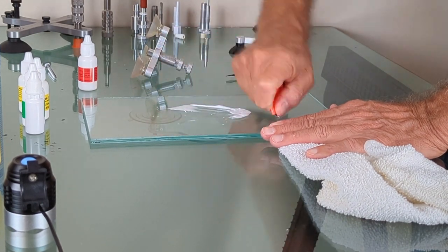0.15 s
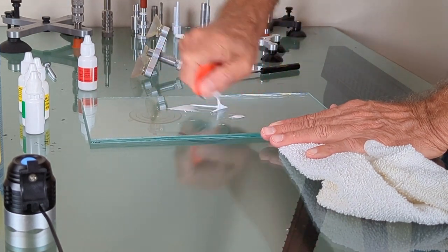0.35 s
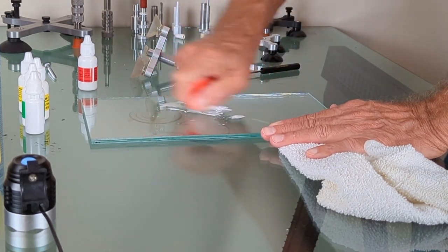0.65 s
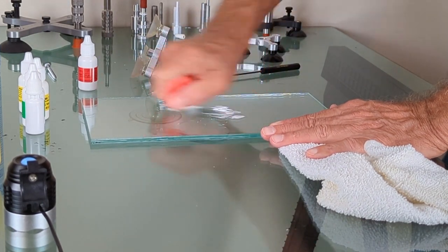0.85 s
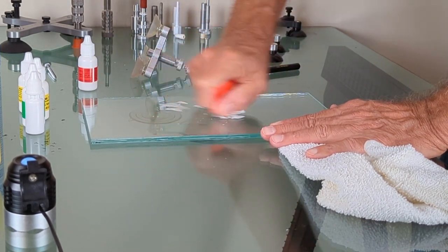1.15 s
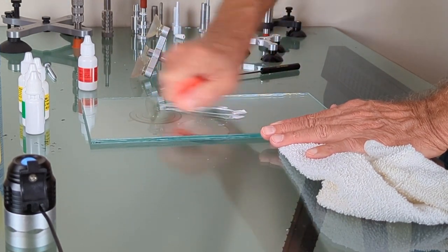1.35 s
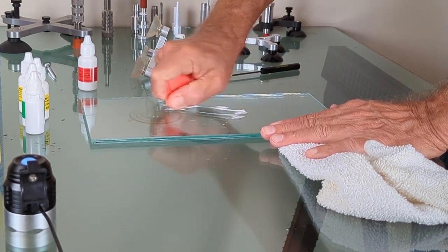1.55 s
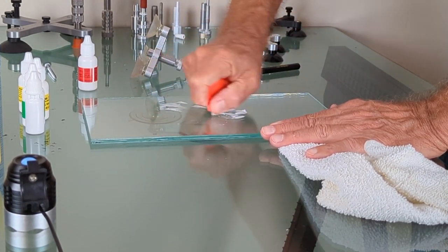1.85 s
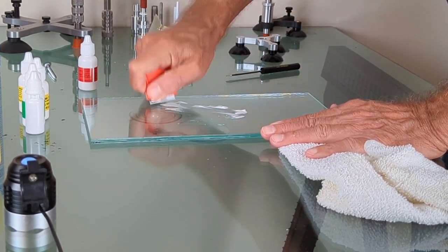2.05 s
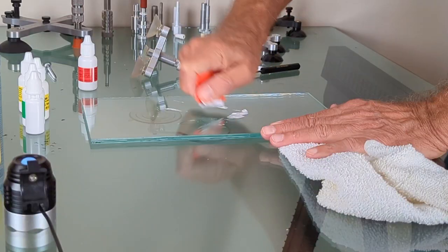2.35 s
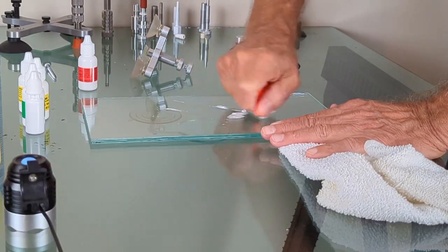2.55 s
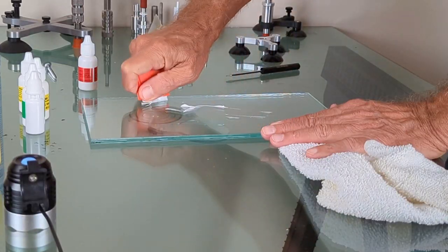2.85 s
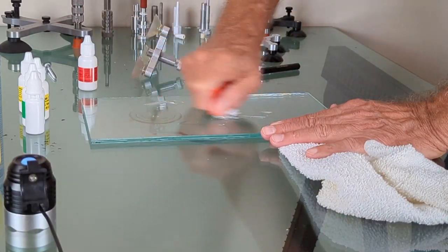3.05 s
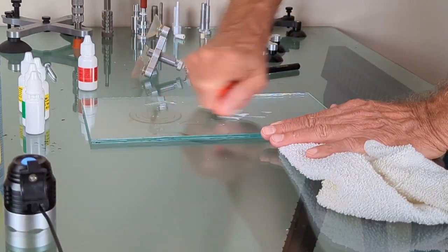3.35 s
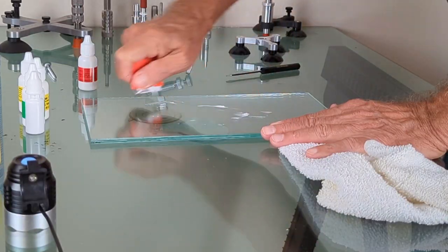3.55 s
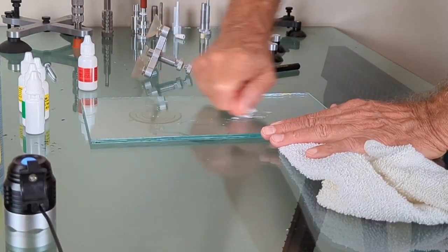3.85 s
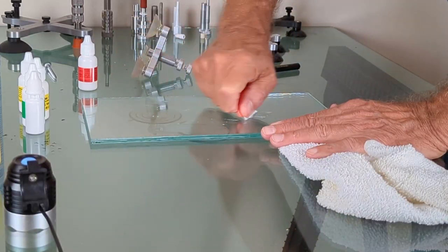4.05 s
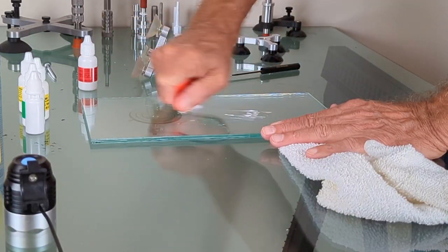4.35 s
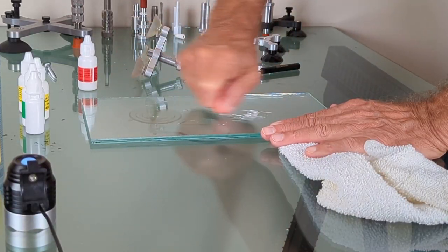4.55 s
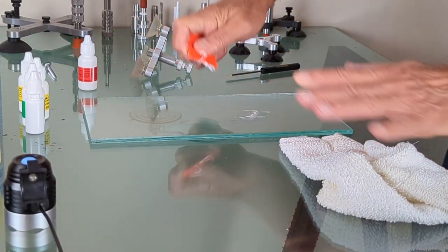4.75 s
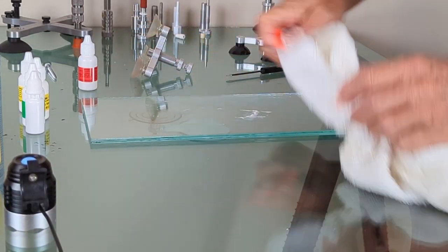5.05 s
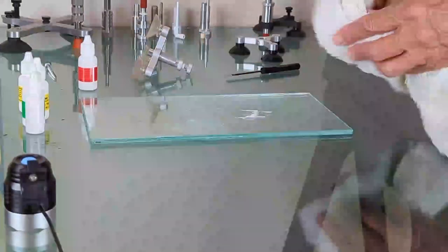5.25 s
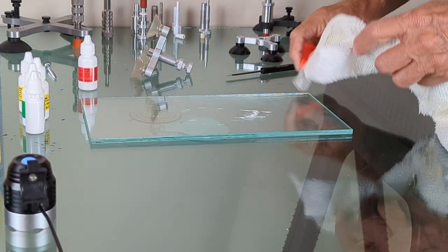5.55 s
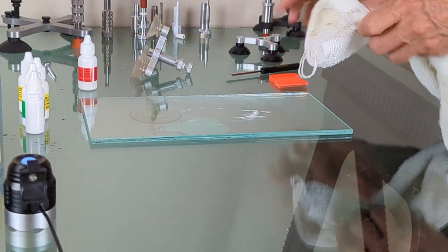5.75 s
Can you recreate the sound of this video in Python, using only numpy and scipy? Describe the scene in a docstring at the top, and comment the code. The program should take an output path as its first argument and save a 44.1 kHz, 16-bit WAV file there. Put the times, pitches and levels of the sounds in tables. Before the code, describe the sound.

A razor scraper cracks and rasps quickly back and forth on a glass plate, softens to light glides, then cloth rustles and plastic clatters.

```python
"""A razor scraper in a plastic holder works wet glue off a glass plate that lies on a glass table, in a small room.
The blade snaps through hard spots: short jolts ring the plate and shake the table. It rasps back and forth as
clumped tiny slips, then taps down and glides lightly over the cleared glass.
At the end filtered noise rustles as a towel is picked up, and the dropped scraper clatters like small blows.
Mains hum (sine tones) and room air (wavering noise) lie underneath."""
import sys
import numpy as np
from scipy import signal
from scipy.fft import rfft, irfft, next_fast_len
from scipy.io import wavfile
from scipy.ndimage import uniform_filter1d, map_coordinates

SR = 44100
rng = np.random.default_rng(int(sys.argv[2]) if len(sys.argv) > 2 else 0)


def materialize(psi):
    """Save the field psi as 16-bit PCM at rate SR to the path in sys.argv[1].

    A 1-D psi becomes a single channel; in a 2-D psi each row is a channel.
    """
    bounded = np.clip(np.atleast_2d(psi).T, -1, 1)
    quanta = np.round(bounded * 32767).astype(np.int16)
    wavfile.write(sys.argv[1], SR, quanta)


N = 259749  # length in samples

# Throughout, t60 is the time in seconds to fade by 60 dB. A movement's level is that of its loudest moment,
# before the room is added; one "half length" away from there it is 2 to 3 dB softer.
KNOCK_HZ, RING_HZ, EDGE_HZ, TOP_HZ = 200, 1100, 3400, 16200  # borders between knock, ring and edge sound


def amp(db):
    """Decibels to gain."""
    return 10 ** (np.asarray(db) / 20)


def unit(x):
    """Scaled to rms 1."""
    return x / np.sqrt(np.mean(x ** 2) + 1e-20)


def along(points, hz):
    """Values between (Hz, value) points, read on a logarithmic frequency axis."""
    f, v = np.transpose(points)
    return np.interp(np.log(hz + 1), np.log(f + 1), v)


def wander(size, positions):
    """A smooth random curve, about rms 1 at its knots, which lie one position apart."""
    return map_coordinates(rng.standard_normal(size), [positions])


def add(track, s, x):
    """Mix x into the track from time s."""
    part = track[:, max(round(s * SR), 0):][:, :x.shape[-1]]
    part += x[..., :part.shape[-1]]


def filtered(x, response):
    """Shape the spectrum of x by a function of frequency."""
    n = x.shape[-1]
    padded = next_fast_len(n + SR // 10)
    spectrum = rfft(x, padded) * response(np.fft.rfftfreq(padded, 1 / SR))
    return irfft(spectrum, padded)[..., :n]


def band(x, lo, hi, order=4):
    """Keep the frequencies from lo to hi, looking only at past samples."""
    return signal.sosfilt(signal.butter(order, [lo, hi], "band", fs=SR, output="sos"), x)


# How alike left and right are. Each row: frequency in Hz, likeness (1 the same, 0 unrelated, below 0 opposed).
ALIKE = [(100, 0.97), (300, 0.85), (700, 0.7), (1500, 0.45), (3100, -0.05), (7000, 0.3), (15000, -0.1)]


def diffuse(n):
    """Stereo noise from all around: alike in the bass, mostly unrelated in the treble."""
    def shares(hz):
        angle = np.arccos(np.clip(along(ALIKE, hz), -1, 1)) / 2
        return np.array([np.cos(angle), np.sin(angle)])
    mid, side = filtered(rng.standard_normal((2, n)), shares)
    return np.array([mid + side, mid - side])


# How far the blade's sound leads on the left. Each row: frequency in Hz, lead in radians before scatter.
LEAD = [(600, 0), (1300, .7), (2500, .75), (3400, 1.9), (7000, 2), (11000, 2.2), (15000, 2.5)]
LEAD_SCATTER = .3  # reflections off the table vary the lead, as a share of it


def placed(x, off_centre):
    """A point source whose sound leads on one side: 0 lies straight ahead, 1 where the blade works."""
    knots = rng.standard_normal(SR // 300)

    def response(hz):
        scatter = 1 + LEAD_SCATTER * map_coordinates(knots, [hz / 500])
        lead = off_centre * along(LEAD, hz) * scatter
        return np.exp(.5j * lead * np.array([[1], [-1]]))
    return filtered(x, response)


def body(colour, peaks, ripple_db=0, size=4096):
    """Impulse response of an object: broad colour, resonances, and a random ripple for its dense modes."""
    hz = np.fft.rfftfreq(size, 1 / SR)
    db = along(colour, hz) + sum(lift / (1 + (2 * (hz - f) / width) ** 2) for f, width, lift in peaks)
    # the place of contact decides how strongly each mode answers
    db = db + ripple_db * wander(size, np.sqrt(hz))
    # keeping one half of the cepstrum makes the response start at once; overall level is set later
    cepstrum = irfft(np.log(amp(db)))[:size // 2]
    return irfft(np.exp(rfft(2 * cepstrum, size)))


# How long the room rings. Each row: frequency in Hz, t60 in seconds.
ROOM = [(100, 0.56), (500, 0.086), (2000, 0.14), (6000, 0.14), (15000, 0.13)]
LATE_DB, LATE_T60_S = -13, .36  # a faint, longer tail of the room


def roomy(x, wet_db):
    """Add a fresh room tail: noise in which each frequency dies at its own speed."""
    hz, t, z = signal.stft(diffuse(SR // 2), SR, nperseg=256)
    early = amp(-60 * t / along(ROOM, hz)[:, None])
    late = amp(LATE_DB - 60 * t / LATE_T60_S)
    onset = 1 - np.exp(-t / .006)
    tail = signal.istft(z * (early + late) * onset, SR)[1]
    tail = tail / np.linalg.norm(tail[0])
    return x + amp(wet_db) * signal.fftconvolve(x, tail, axes=1)[:, :x.shape[1]]


def at_level(x, db, seconds):
    """Scale x so that its first moments, both sides averaged, have this rms level."""
    return x * amp(db) / np.sqrt(np.mean(x.mean(0)[:int(seconds * SR)] ** 2))


SURFACE_DB = -2  # chatter radiated by the whole surface, relative to the point of contact


def contact(response, chatter_t60, snap_db, rebound_db, off_centre):
    """A sharp snap, a rebound a few ms later and separate dying jolts, sent through a body."""
    t = np.arange(SR // 3) / SR
    snap = np.zeros(len(t))
    snap[SR // 1400] = amp(snap_db)
    snap[int(SR * rng.uniform(.003, .0045))] = amp(snap_db + rebound_db)
    ragged = amp(3.5 * wander(len(t), 500 * t))
    jolts = rng.standard_normal(len(t)) * (rng.random(len(t)) < .08)
    # part comes straight from the point of contact, part from the whole surface
    chatter = placed(unit(jolts), off_centre) + amp(SURFACE_DB) * diffuse(len(t))
    chatter = chatter * ragged * amp(-60 * t / chatter_t60)
    force = placed(snap, off_centre) + chatter / np.linalg.norm(chatter[0])
    return signal.fftconvolve(force, response[None], axes=1)[:, :len(t)]


def three_part_hit(crack, knock, ring_db, edge_db, knock_db, knock_from_hz):
    """A hit from three frequency bands, low knock, ring and edge, each set to its own level."""
    ring = at_level(band(crack, RING_HZ, EDGE_HZ), ring_db, .019)
    edge = at_level(band(crack, EDGE_HZ, TOP_HZ), edge_db, .019)
    return ring + edge + at_level(band(knock, knock_from_hz, RING_HZ), knock_db, .03)


def sliding(colour, peaks, grain_rate, grain_db, smooth_db, rough_db, size=N):
    """Friction: a stream of tiny slips of uneven size that come in clumps, heard through a body."""
    happens = rng.random(size) < grain_rate / SR  # grain_rate: slips per second
    slips = happens * rng.standard_normal(size) * amp(grain_db * rng.standard_normal(size))
    clumps = amp(rough_db * wander(size, 160 * np.arange(size) / SR))
    force = clumps * (placed(unit(slips), off_centre=1) + amp(smooth_db) * diffuse(size))
    return signal.oaconvolve(force, body(colour, peaks)[None], axes=1)[:, :size]


def swells(middles, halves, dbs):
    """Power of bell-shaped movements of the hand."""
    t, power = np.arange(N) / SR, np.zeros(N)
    for s, half, db in zip(middles, halves, dbs):
        near = abs(t - s) < 4 * half
        power[near] += amp(db) ** 2 * np.exp(-((t[near] - s) / (1.4 * half)) ** 2)
    return power


RUB_MIDDLE_S = .25
RUB_GRAIN_DB, RUB_ROUGH_DB = 2.5, 2.5  # uneven size of the slips, and how strongly they clump


def brief_rub(colour, peaks, half, db, grain_rate, smooth_db):
    """Half a second of friction holding one gritty bell-shaped rub at its middle."""
    t = np.arange(SR // 2) / SR
    bell = np.exp(-.5 * ((t - RUB_MIDDLE_S) / (1.28 * half)) ** 2)
    rub = bell * sliding(colour, peaks, grain_rate, RUB_GRAIN_DB, smooth_db, RUB_ROUGH_DB, size=len(t))
    return amp(db) * rub * np.sqrt(np.sum(bell ** 2) / np.sum(rub.mean(0) ** 2))


AIR_PATCHY_DB, AIR_DRIFT_DB = 1.8, .7  # the air wavers in patches and as a whole (rms)


def wavering(x):
    """Give x slow patches of random gain over time and frequency."""
    z = signal.stft(x, nperseg=512)[2]
    patches = uniform_filter1d(rng.standard_normal(z.shape[1:]), size=7, axis=0)
    patches = uniform_filter1d(patches, size=16, axis=1)
    drift = uniform_filter1d(rng.standard_normal(z.shape[2]), size=30)
    gain = amp(AIR_PATCHY_DB * unit(patches) + AIR_DRIFT_DB * unit(drift))
    return signal.istft(z * gain, nperseg=512)[1][:, :N]


# Colour of the room air. Each row: frequency in Hz, relative level in dB per Hz.
AIR = [(20, -29), (40, -25), (60, -2.5), (85, -13.5), (120, -5), (200, -18), (380, -17.5), (680, -23),
       (830, -30), (1400, -31.5), (2100, -28.5), (2800, -29), (3700, -35), (5200, -42), (6400, -37.5),
       (8000, -44.5), (9000, -42), (11700, -53), (16000, -55.5)]
# Tones of the mains hum. Each row: frequency in Hz, level in dB rms.
HUM = [(59.6, -62), (119.5, -73.5), (232, -73), (291, -76), (404, -81.5)]
# A faint ring that is already dying away. Each row: frequency in Hz, width in Hz, starting level in dB,
# t60 in seconds.
FADING_RING = [(2290, 400, -56, 0.33), (3224, 60, -49, 0.2), (4290, 200, -56, 0.33),
               (6487, 220, -53.5, 0.3)]


def background():
    """Room air is coloured noise, mains hum is steady tones, and narrow noise rings out at the start."""
    t = np.arange(N) / SR
    air = amp(-56.5) * unit(wavering(filtered(diffuse(N), lambda hz: amp(along(AIR, hz)))))
    hum = sum(np.sqrt(2) * amp(db) * np.sin(2 * np.pi * (hz * t + rng.random())) for hz, db in HUM)
    for hz, width, db, t60 in FADING_RING:
        ring = unit(band(diffuse(SR), hz - width / 2, hz + width / 2, order=1))
        add(air, 0, ring * amp(db - 60 * t[:SR] / t60))
    return air + hum


# The towel rustles. Each row: middle in seconds, half length in seconds, level in dB,
# frequency in Hz around which it is brightened.
RUSTLES = [(4.688, 0.01, -63, 3230), (4.73, 0.033, -67, 3700), (4.828, 0.0054, -58.5, 3770),
           (4.902, 0.034, -60.5, 2160), (5.203, 0.016, -65, 2514), (5.302, 0.027, -62, 2400),
           (5.362, 0.022, -58, 4240), (5.584, 0.042, -65.5, 2000), (5.861, 0.026, -62.5, 2370)]
# Colour of the towel. Each row: frequency in Hz, relative level in dB per Hz.
TOWEL = [(200, -15.5), (680, 7.5), (900, -4.5), (2400, 1.5), (4000, -0.5), (9000, -5.5), (16000, -25)]
# The hand bumps the table softly. Each row: frequency in Hz, level in dB before the soft onset, t60 in seconds.
BUMP = [(100, -44, .15), (160, -44, .11), (300, -42, .11), (370, -47, .1), (680, -50, .05),
        (1040, -58, .03)]
BUMP_TIME = 4.857  # seconds
# The hand slides off the table: start in seconds, starting pitch, its rise, level before fade and soft onset.
JUDDER_TIME, JUDDER_HZ, JUDDER_RISE_HZ_PER_S, JUDDER_DB = 4.872, 300, 1500, -38


def towel():
    """The steadying hand rubs cloth, bumps table modes and slides off with a rising judder."""
    t, out = np.arange(SR // 3) / SR, np.zeros((2, N))
    for s, half, db, bright_hz in RUSTLES:
        rustle = brief_rub(TOWEL, [(bright_hz, 1200, 5)], half, db, grain_rate=5000, smooth_db=3)
        add(out, s - RUB_MIDDLE_S, rustle)
    bump = sum(amp(db - 60 * t / t60) * np.sin(2 * np.pi * (hz * t + rng.random())) for hz, db, t60 in BUMP)
    add(out, BUMP_TIME, bump * (1 - np.exp(-t / 0.0023)))
    pitch = JUDDER_HZ + JUDDER_RISE_HZ_PER_S * t + 40 * wander(len(t), 200 * t)
    judder = np.sin(2 * np.pi * np.cumsum(pitch) / SR)
    add(out, JUDDER_TIME, judder * amp(JUDDER_DB - 60 * t / 0.15) * (1 - np.exp(-t / 0.012)))
    return out


# The dropped scraper bounces. Each row: start in seconds, ring level in dB, edge level in dB, knock level in dB,
# t60 of the rattle in seconds, snap over rattle in dB, ring in Hz, edge ring in Hz.
BOUNCES = [(5.652, -35, -44.5, -55, 0.036, -4, 2010, 5500), (5.682, -37, -43, -53.5, 0.15, -3, 2190, 6100),
           (5.7064, -31.5, -26, -43, 0.051, -4, 2220, 8800), (5.718, -50, -34.5, -44, 0.12, -7, 2260, 4050),
           (5.7583, -41, -35, -53.5, 0.075, -7.5, 2600, 4300)]
# Colour of the plastic holder on the table. Each row: frequency in Hz, relative level in dB.
HOLDER = [(150, -6), (400, 2.5), (750, -2.5), (1000, -15), (1500, -1), (2100, 0), (3200, -6.5), (4200, -8),
          (5100, -12), (6500, -2), (7500, -7.5), (9300, -4), (12000, -13), (16000, -15)]
# Its resonances. Each row: frequency in Hz, width in Hz, lift in dB.
HOLDER_PEAKS = [(3790, 430, 7.8), (4380, 74, 4), (8540, 290, 4.4)]


def dropped_scraper():
    """The light plastic holder skids and clatters on the table; each corner that lands rings differently."""
    out = np.zeros((2, N))
    for s, ring_db, edge_db, knock_db, rattle_t60, snap_db, ring_hz, edge_hz in BOUNCES:
        rings = [(ring_hz, 620, 9), (edge_hz, 650, 7)]
        holder = body(HOLDER, HOLDER_PEAKS + rings, ripple_db=4.0)
        clack = contact(holder, rattle_t60, snap_db, rebound_db=-8, off_centre=-.5)
        # the low knock rattles on longer
        knock = contact(holder, rattle_t60 + 0.15, snap_db=-12.0, rebound_db=6.5, off_centre=-.5)
        hit = three_part_hit(clack, knock, ring_db, edge_db, knock_db, KNOCK_HZ / 2)
        add(out, s, roomy(hit, wet_db=-14.5))
    skid = unit(filtered(diffuse(N), lambda hz: amp(along(HOLDER, hz))))
    return out + skid * np.sqrt(swells([5.651, 5.68, 5.704], [.004, .012, .003], [-48, -48, -41]))


# Colour of the blade lifting off. Each row: frequency in Hz, relative level in dB.
TICK = [(2000, -32), (6000, -22), (8500, -14), (9200, 0), (10200, -5), (11300, -4), (12500, -22),
        (16000, -36)]
TICK_TIME, TICK_DB = 4.606, -60  # start in seconds, level


def lift_off():
    """The wet blade leaves the glass with a thin, high tick: one small contact, brightly coloured."""
    out = np.zeros((2, N))
    tick = contact(body(TICK, []), 0.07, snap_db=-14, rebound_db=0, off_centre=.5)
    add(out, TICK_TIME, at_level(tick, TICK_DB, .019))
    return out


# Light strokes over the cleared glass. Each row: middle in seconds, half length in seconds, level in dB,
# blade resonance in Hz.
PASSES = [(1.939, 0.018, -70, 2120), (2.211, 0.02, -63, 2250), (2.326, 0.018, -70, 2310),
          (2.665, 0.013, -62, 2120), (2.978, 0.021, -61.5, 2195), (3.099, 0.02, -62, 2260),
          (3.166, 0.018, -57, 1980), (3.338, 0.032, -58.5, 2270), (3.783, 0.012, -55.5, 2185),
          (3.908, 0.013, -63, 2500), (3.993, 0.03, -62, 2150), (4.124, 0.019, -64.5, 2280),
          (4.179, 0.0093, -51, 2240), (4.206, 0.019, -60, 2160), (4.321, 0.026, -62.5, 2340),
          (4.384, 0.0083, -51, 2200), (4.408, 0.009, -57, 1890), (4.555, 0.043, -63, 2150)]
# Under light pressure the blade itself whispers. Each row: frequency in Hz, relative level in dB.
GLIDE = [(300, -15), (650, -16), (900, -29), (1350, -20), (1600, -5), (2100, -5), (2550, -5), (3200, -14),
         (4200, -19), (5200, -14), (6200, -7), (7600, -19), (9300, -13), (12000, -27), (16000, -40)]
GLIDE_WIDTH_HZ, GLIDE_LIFT_DB = 1000, 6  # the blade's resonance
GLIDE_RUMBLE_DB = -1  # the table rumbles under the moving hand, relative to the stroke


def passes():
    """Light friction swells and fades with the hand's speed; the blade's resonance shifts with its angle."""
    out = np.zeros((2, N))
    for s, half, db, ring_hz in PASSES:
        resonance = [(ring_hz, GLIDE_WIDTH_HZ, GLIDE_LIFT_DB)]
        add(out, s - RUB_MIDDLE_S, brief_rub(GLIDE, resonance, half, db, grain_rate=1800, smooth_db=-6))
    middles, halves, dbs, _ = np.transpose(PASSES)
    # the rumble comes a little later and lasts twice as long
    power = swells(middles + halves, 2 * halves, dbs + GLIDE_RUMBLE_DB)
    rumble = unit(band(diffuse(N), 62, 130, order=2)) * np.sqrt(power)
    return roomy(out, wet_db=-10) + rumble


# Hard scrubbing, about six times a second. Each row: push start in seconds, push level in dB,
# turning back in seconds, return level in dB.
SCRUBS = [(0.588, -46, 0.648, -37.5), (0.731, -52, 0.833, -37), (0.922, -33, 1.016, -32),
          (1.083, -37, 1.187, -33), (1.247, -39, 1.353, -51), (1.408, -43.5, 1.521, -54),
          (1.575, -47, 1.683, -53.5), (1.751, -51, 1.85, -68.5)]
# The blade stays down while glue is left. Each row: middle in seconds, half length in seconds, level in dB.
RUBS = [(0.788, 0.12, -52), (1.614, 0.13, -59.5)]
PUSH_PEAK_S, PUSH_HALF_S = 0.014, 0.0084  # a push is loudest this long after it starts; its half length
RETURN_LEAD_S, RETURN_HALF_S, RETURN_RASP_DB = 0.022, 0.013, -7  # the blade slides on around the turn
FIRM_DB = -30  # ring level of a firm blow
GRIND_DB, GRIND_HALF_S = -16, 0.0078  # a blow harder than firm grinds, this far under its ring


def scrubbing(s):
    """Whether time s lies within the hard scrubbing."""
    return SCRUBS[0][0] <= s < SCRUBS[-1][0]


def slides():
    """Every push, return, grind through glue and longer rub: (middle s, half length s, rasp dB)."""
    pushes = [(start + PUSH_PEAK_S, PUSH_HALF_S, db) for start, db, _, _ in SCRUBS]
    returns = [(turn - RETURN_LEAD_S, RETURN_HALF_S, db + RETURN_RASP_DB) for _, _, turn, db in SCRUBS]
    grinds = [(s, GRIND_HALF_S, db + GRIND_DB) for s, db, *_ in BLOWS if db > FIRM_DB and scrubbing(s)]
    return pushes + returns + grinds + RUBS


# Colour of the blade on the plate. Each row: frequency in Hz, relative level in dB.
GLASS = [(150, -19.5), (300, -12), (420, -6), (620, -6.5), (820, -8), (1050, -11), (1550, -6), (2400, -6.5),
         (3300, -7.5), (6200, -5), (7400, -9.5), (10000, -7.5), (13000, -17), (16000, -26)]
# Its resonances and dips. Each row: frequency in Hz, width in Hz, lift in dB.
GLASS_PEAKS = [(292, 35, 4), (415, 45, 4), (500, 35, 3), (624, 60, 5), (700, 40, 5), (790, 70, -8),
               (1035, 80, -6), (1157, 50, 5), (1260, 80, -3), (1365, 40, 3), (1495, 60, 4), (1630, 80, 6.5),
               (1820, 80, -4), (1965, 70, 5), (2070, 70, -5), (2215, 110, 4), (2400, 90, -5), (2560, 90, 7),
               (2890, 85, 3), (3500, 300, -4), (3830, 130, 3), (4160, 70, 3), (5200, 450, -4),
               (6060, 110, 5), (6240, 80, 4), (8800, 500, 5)]
# edge hiss over the rasp of a gentle stroke; it grows with pressure
GENTLE_DB, HISS_DB, HISS_DB_PER_DB = -60, -9, 0.1932


def strokes():
    """Each scrubbing stroke swells and fades with the speed of the hand, and its grit rings the plate."""
    middles, halves, rasp_db = np.transpose(slides())
    hiss_db = rasp_db + HISS_DB + HISS_DB_PER_DB * (rasp_db - GENTLE_DB)
    rasp_gain = np.sqrt(swells(middles, halves, rasp_db))
    hiss_gain = np.sqrt(swells(middles, halves, hiss_db))
    glass = sliding(GLASS, GLASS_PEAKS, grain_rate=3500, grain_db=2.5, smooth_db=-6, rough_db=4)
    rasp = unit(band(glass, KNOCK_HZ, EDGE_HZ))
    hiss = unit(band(glass, EDGE_HZ, TOP_HZ))
    rumble = amp(-12.0) * unit(band(diffuse(N), 65, 100))
    pressing = np.minimum(rasp_gain, amp(-51.0))  # the table yields only so far to the hand
    return roomy(rasp_gain * rasp + hiss_gain * hiss + pressing * rumble, wet_db=-7.5)


# The blade strikes or breaks free. Each row: start in seconds, plate ring in dB, blade edge in dB, knock in dB,
# table thump in dB, snap over chatter in dB, strongest ring in Hz, its lift in dB, second ring in Hz,
# edge ring in Hz, strongest knock in Hz.
BLOWS = [(0.154, -40.5, -42, -43, -50, 0, 1860, 16, 3440, 9760, 320),
         (0.4754, -27, -33, -38.5, -47.5, -4, 2070, 4, 3060, 13600, 397),
         (0.5913, -20.5, -27, -36, -44.5, -3.5, 2090, 18, 1680, 4150, 534),
         (0.611, -24.5, -23.5, -31.5, -54, -3.5, 1980, 13, 3970, 6200, 455),
         (0.762, -15.5, -25.5, -26, -46, -3, 2390, 11.5, 2080, 3900, 574),
         (0.9466, -17, -26.5, -39.5, -44.5, -8, 2240, 11, 1530, 4900, 590),
         (1.1146, -17.5, -25.5, -37, -43, -3.5, 1750, 11, 2600, 5930, 755),
         (1.2751, -25, -42, -33, -46, -7.5, 2020, 8.5, 2870, 6100, 483),
         (1.424, -46, -53.5, -48, -56, -8.5, 2230, 12, 1620, 8900, 416),
         (1.595, -48.5, -55, -47.5, -52, -8, 2170, 9, 3100, 8950, 410),
         (1.788, -43, -59, -48, -59.5, -9, 2200, 2, 1660, 6200, 430),
         (2.0744, -40.5, -48, -44.5, -52, 0, 2210, 7.5, 1790, 14350, 399),
         (2.54, -46.5, -43, -58, -55, -3, 3254, 10.5, 1110, 5950, 317),
         (2.842, -45, -51, -56.5, -57.5, -4, 1607, 9.5, 2237, 2900, 403),
         (3.627, -48.5, -38.5, -53, -58, -17, 2862, -3.5, 1650, 8720, 394),
         (3.7901, -28.5, -46.5, -32, -52.5, 0, 1680, 12, 2040, 6300, 510)]
# The blade catches lightly as a push starts and as it turns back:
PUSH_CATCH_DB = -5.5  # ring of the catch at the start of a push, relative to the push
CATCH_EDGE_DB, CATCH_KNOCK_DB = -9.5, -9.5  # relative to the ring of the catch
CATCH_RINGS_HZ, CATCH_SPREAD = (2080, 1770, 6310), 0.055  # strongest, second and edge ring; their scatter
CATCH_SNAP_DB, CATCH_LIFT_DB, CATCH_KNOCK_HZ = -8, 7, 450  # snap over chatter, lift of strongest ring, knock
SHOVE_DB, SHOVE_DB_PER_DB = -42.5, 0.62  # a reversal of the hand shakes the table: when firm, and its growth


def contacts():
    """Every blow, and the light catches at both ends of a push, in the columns of BLOWS."""
    rows = list(BLOWS)
    for start, push_db, turn, return_db in SCRUBS:
        for s, db in (start, push_db + PUSH_CATCH_DB), (turn, return_db):
            shove_db = SHOVE_DB + SHOVE_DB_PER_DB * (db - FIRM_DB)
            ring_hz, second_hz, edge_hz = np.array(CATCH_RINGS_HZ) * np.exp(rng.normal(0, CATCH_SPREAD, 3))
            rows.append((s, db, db + CATCH_EDGE_DB, db + CATCH_KNOCK_DB, shove_db, CATCH_SNAP_DB,
                         ring_hz, CATCH_LIFT_DB, second_hz, edge_hz, CATCH_KNOCK_HZ))
    return rows


# Low modes of the table. Each row: typical frequency in Hz, typical relative level in dB, t60 in seconds.
TABLE = [(65, -1.5, .55), (80, -1, 0.5), (93, -3, 0.4), (138, -12, 0.16), (157.6, 0, 0.4),
         (256, -18.5, 0.3), (300, -10, 0.2), (405.5, -14, 0.35)]


def table_thump(t, db):
    """A blow sets the table's low modes swinging, a little differently each time."""
    modes = np.zeros(len(t))
    for hz, mode_db, t60 in TABLE:
        level = amp(mode_db + rng.normal(0, 4) - 60 * t / t60)
        shifted_hz = hz * (1 + rng.normal(0, 0.028))
        modes += level * np.sin(2 * np.pi * shifted_hz * t + rng.uniform(0, 2 * np.pi))
    onset = 1 - np.exp(-t / 0.0041)
    return at_level(band(modes[None] * onset, 60, 600), db, 0.18)


# The plate's middle range sounds under scrubbing pressure and stays hollow under a free tap,
# whose edge rings more clearly.
HOLLOW_HZ, HOLLOW_WIDTH_HZ = 965, 420
PRESSED_DB, TAPPED_DB = (5, 5), (-12, 6.5)  # (middle range lift, edge ring lift)
RING_WIDTH_HZ, KNOCK_WIDTH_HZ = 470, 280  # hand and table damp the strongest ring and the knock
EDGE_WIDTH_HZ = 1300  # the fingers damp the blade's edge ring
CHATTER_T60_S = .055  # the blade chatters out after every contact


def blows():
    """Each hit swells in briefly, cracks at the edge, rings the plate and shakes the table under it."""
    out, t = np.zeros((2, N)), np.arange(SR // 3) / SR
    before = np.arange(-SR // 80, 0) / SR
    fade = np.minimum(1, 10 * (t[-1] - t))
    for (s, ring_db, edge_db, knock_db, thump_db, snap_db,
         ring_hz, lift_db, second_hz, edge_hz, knock_hz) in contacts():
        middle_db, edge_lift_db = PRESSED_DB if scrubbing(s) else TAPPED_DB
        rings = [(ring_hz, RING_WIDTH_HZ, lift_db), (second_hz, 280, 6),
                 (edge_hz, EDGE_WIDTH_HZ, edge_lift_db), (knock_hz, KNOCK_WIDTH_HZ, 6),
                 (HOLLOW_HZ, HOLLOW_WIDTH_HZ, middle_db)]
        glass = body(GLASS, GLASS_PEAKS + rings, ripple_db=2.5)
        crack = contact(glass, CHATTER_T60_S, snap_db, rebound_db=-4, off_centre=1)
        # low modes last longer
        knock = contact(glass, CHATTER_T60_S + 0.039, snap_db - 0.5, rebound_db=-1.5, off_centre=0.9)
        hit = three_part_hit(crack, knock, ring_db, edge_db, knock_db, KNOCK_HZ)
        add(out, s, fade * (roomy(hit, wet_db=-15.5) + table_thump(t, thump_db)))
        # a short noise in the plate's colour swells over the last 12 ms before each hit
        swell = signal.fftconvolve(diffuse(len(before)), glass[None], axes=1)[:, :len(before)]
        add(out, s + before[0], unit(swell) * amp(ring_db - 6.5 + 60 * before / 0.03))
    return out


def scene():
    """Everything on the work table."""
    return background() + towel() + dropped_scraper() + lift_off() + passes() + strokes() + blows()


def record(dry):
    """Round off the highest peaks and keep almost nothing above the top frequency."""
    rounded = dry / (1 + np.abs(dry / .9) ** 6) ** (1 / 6)
    return filtered(rounded, lambda hz: 1 / (1 + (hz / TOP_HZ) ** 120))


dry = scene()
out = record(dry)
materialize(out)
```